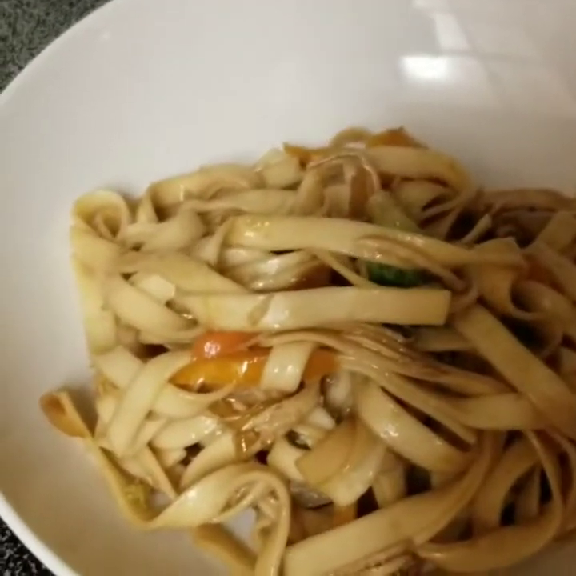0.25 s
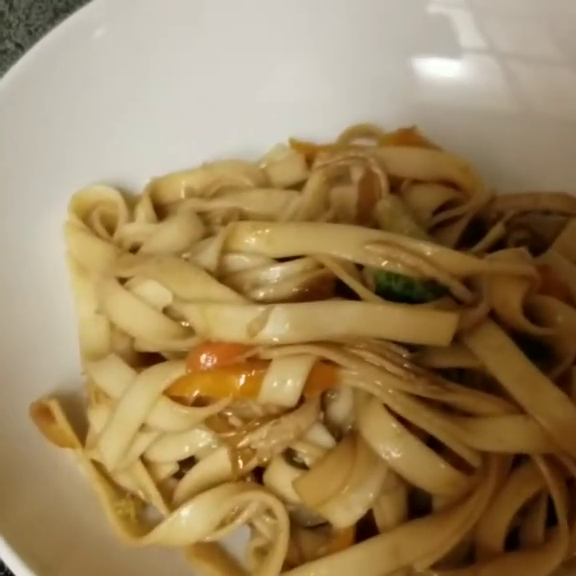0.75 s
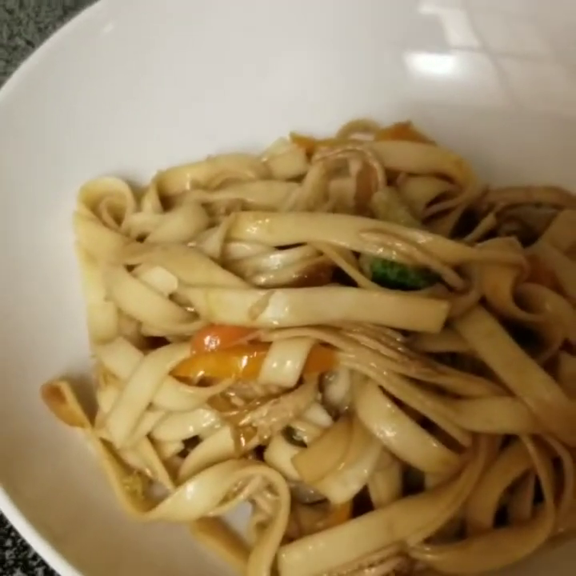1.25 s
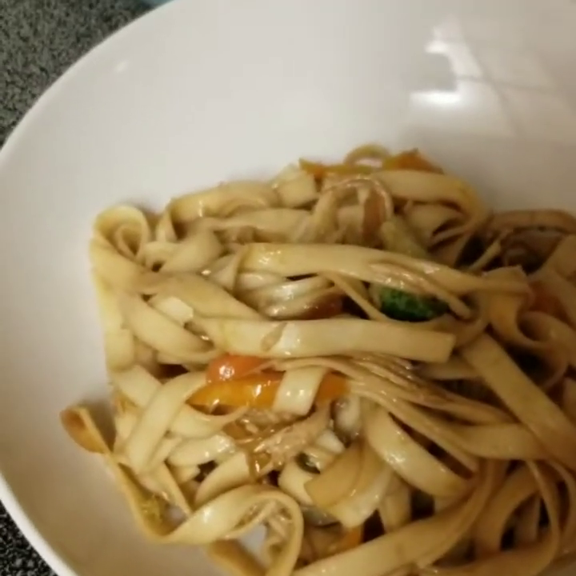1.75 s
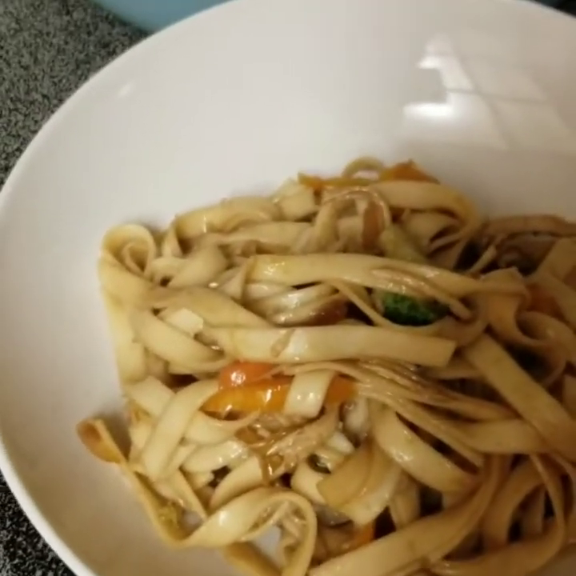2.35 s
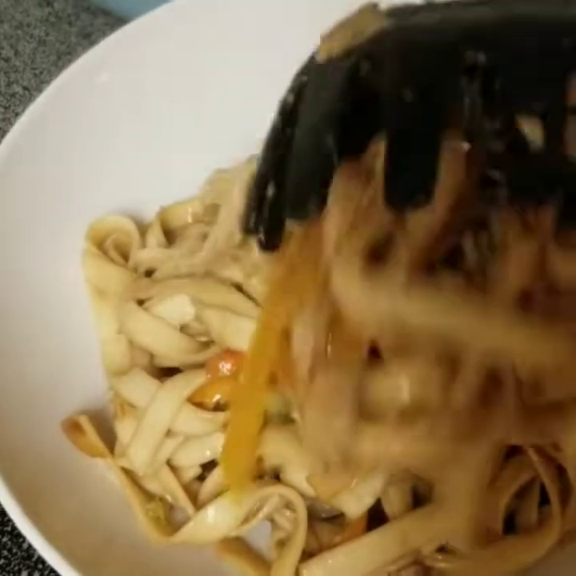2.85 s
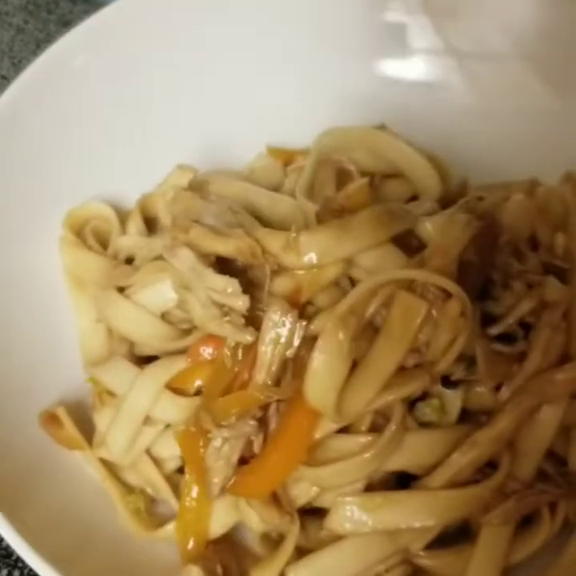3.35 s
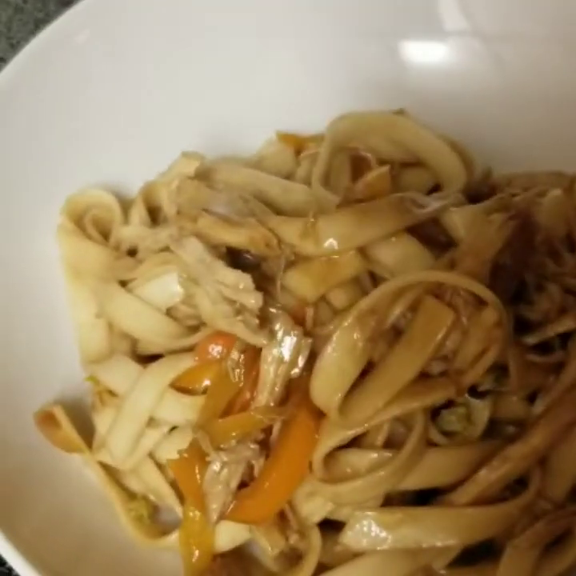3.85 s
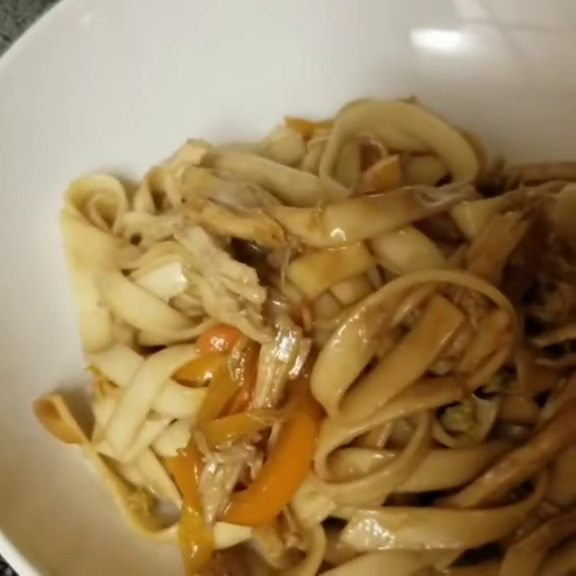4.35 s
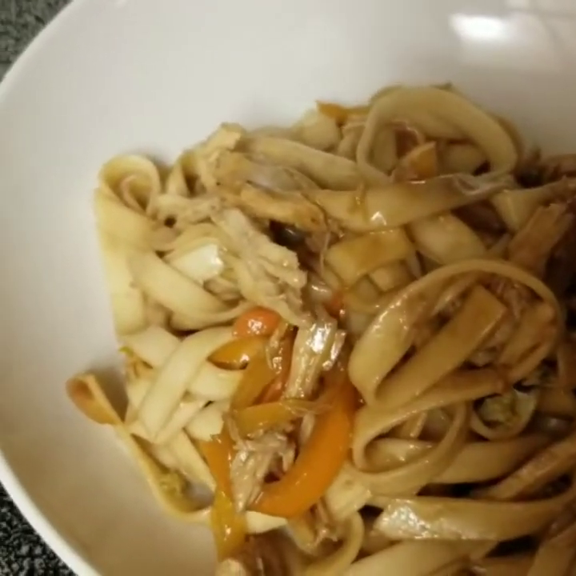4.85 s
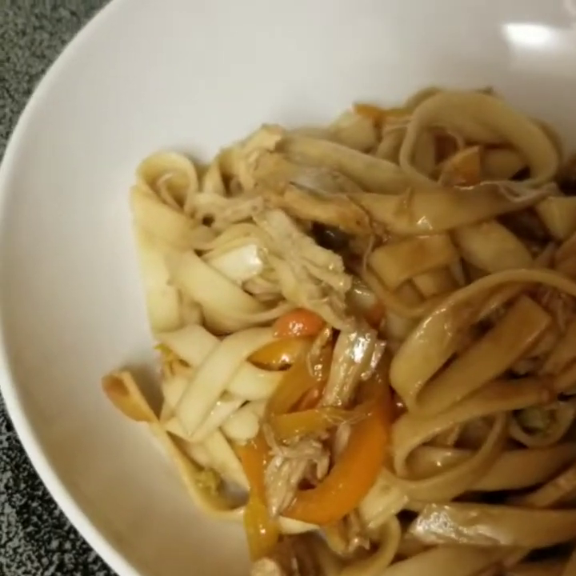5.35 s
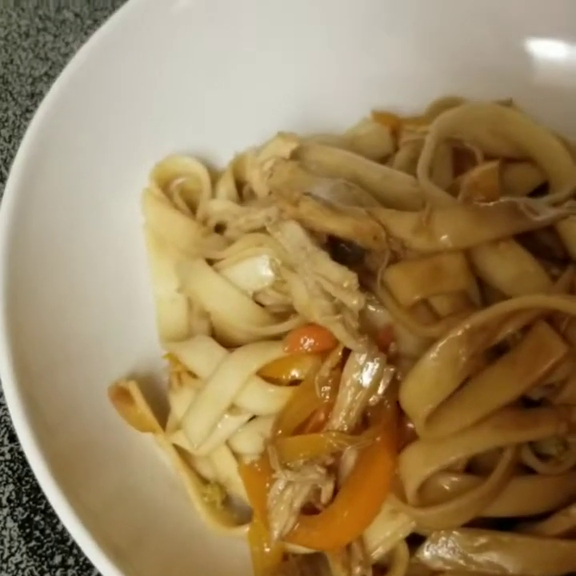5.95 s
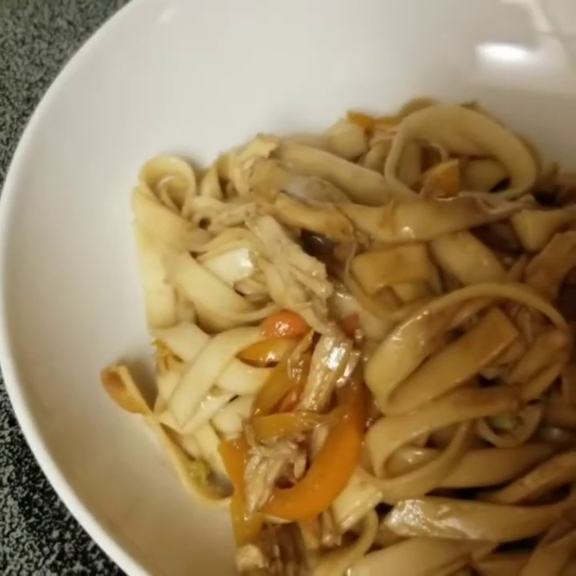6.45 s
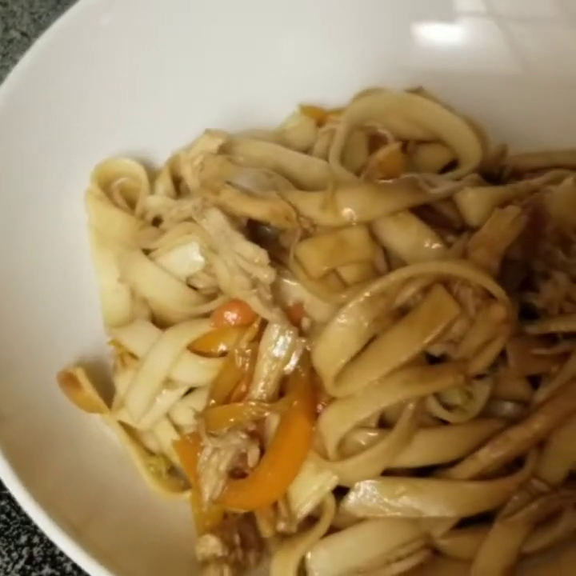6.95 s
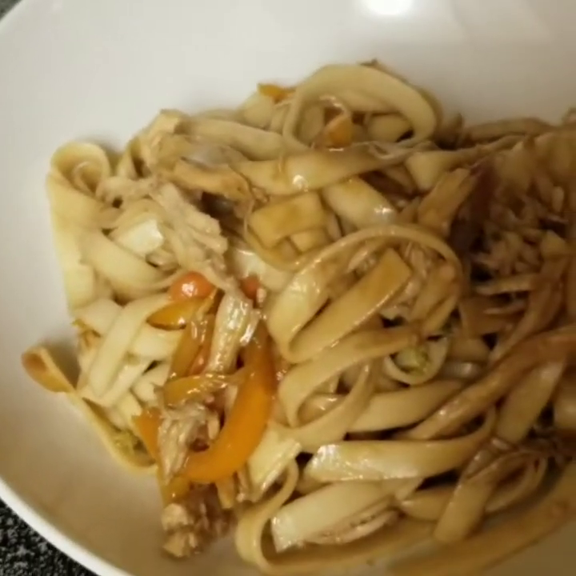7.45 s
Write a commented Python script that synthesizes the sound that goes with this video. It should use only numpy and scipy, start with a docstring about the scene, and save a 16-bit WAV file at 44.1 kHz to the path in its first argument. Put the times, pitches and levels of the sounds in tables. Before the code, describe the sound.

A soft low hum with moving air and faint hiss runs throughout. Close to the stereo microphone, tongs strike loaded crockery four times, each a hard, damped double click with little ring, some followed by a tiny skidding rattle. Brief rubbing squeaks come before three of them. Noodles smack and crackle very faintly between, with light handling rustles and a last tiny tap at the end.

```python
"""Tongs and noodles in a kitchen

Plastic tongs serve cooked noodles into a ceramic bowl, close to a stereo microphone.
Four times the tongs clack on the loaded crockery, one arm just after the other, exciting damped modes;
slips of the tips then skid on. Before three of the clacks, short scrapes squeak in sliding bands of noise.
The wet noodles smack and crackle faintly in bursts of noise, among light taps and handling rustles.
To the left an appliance hums on fixed lines and rumbles in shaped noise, under moving air and thin hiss."""
import sys
import numpy as np
from scipy import signal
from scipy.fft import rfft, irfft, next_fast_len
from scipy.io import wavfile
from scipy.ndimage import map_coordinates

SR = 44100
rng = np.random.default_rng(int(sys.argv[2]) if len(sys.argv) > 2 else 0)


def transcribe(signal):
    """Save signal, clipped to [-1, 1], as a 16-bit WAV file at the path in sys.argv[1]."""
    frames = np.atleast_2d(signal).T
    limited = np.clip(frames, -1, 1)
    pcm = np.round(limited * 32767).astype(np.int16)
    wavfile.write(sys.argv[1], SR, pcm)


N = 340011
TOP_HZ = 15780  # band limit of the recorder
# how alike the two sides of the kitchen noise and the rustles are: hz, likeness (1 = same on both sides)
LIKENESS = [(60, 1), (150, 0.94), (380, 1), (950, 0.11), (2380, 0.16), (5980, 0.055), (15000, 0.17)]


def amp(db):
    """Decibels to gain."""
    return 10 ** (np.asarray(db) / 20)


def unit(x):
    """Scale to rms 1."""
    return x / np.sqrt(np.mean(x ** 2) + 1e-20)


def along(points, hz):
    """Read (Hz, value) points on a log frequency axis."""
    f, v = np.transpose(points)
    return np.interp(np.log(hz + 1), np.log(f), v)


def level_curve(points):
    """Draw straight lines through (s, dB) points, one value per sample."""
    s, db = np.transpose(points)
    return np.interp(np.arange(N) / SR, s, db)


def wobble(rate):
    """A smooth random curve, rate knots a second."""
    knots = rng.standard_normal(int(N * rate / SR) + 4)
    return map_coordinates(knots, [np.arange(N) * rate / SR])


def filtered(x, response):
    """Multiply the spectrum of x by a response of frequency."""
    n = x.shape[-1]
    m = next_fast_len(n + 8192)
    return irfft(rfft(x, m) * response(np.fft.rfftfreq(m, 1 / SR)), m)[..., :n]


def band(x, low_hz, high_hz):
    """Causal band-pass."""
    edges = [low_hz, min(high_hz, SR / 2 - 100)]
    return signal.sosfilt(signal.butter(3, edges, btype="band", fs=SR, output="sos"), x)


def resonance(f, hz, width_hz):
    """Causal response of one resonance, 1 at its peak."""
    return 1j * f * width_hz / (hz * hz - f * f + 1j * f * width_hz)


def noise(spectrum, alike, n):
    """Coloured stereo noise of rms 1; a shared and an opposed part set the left-right likeness."""
    def response(hz):
        turn = np.arccos(np.clip(along(alike, hz), -1, 1)) / 2
        return amp(along(spectrum, hz)) * [np.cos(turn), np.sin(turn)]

    mid, side = filtered(rng.standard_normal((2, n)), response)
    return unit(np.array([mid + side, mid - side]))


def pan(db):
    """Channel gains for a left-right level difference."""
    return amp([[db / 2], [-db / 2]])


def add(track, s, sound):
    """Mix a sound into the track at time s."""
    part = track[:, round(s * SR):][:, :sound.shape[1]]
    part += sound[:, :part.shape[1]]


def kitchen(drift_db=0.68, drifts_per_s=3):
    """An appliance hums and rumbles, with moving air and a thin hiss; each layer drifts a little."""
    # spectra before scaling to rms 1: hz, relative_db
    rumble_colour = [(20, -9.5), (35, -11), (48, -7.5), (60, 6), (80, 0.5), (95, -3), (118, -12),
                     (135, -5.5), (170, -18.5), (260, -47)]
    air_colour = [(100, -11), (160, -4.5), (200, -0.5), (260, 1.5), (330, -4.5), (450, -8.5), (520, -6.5),
                  (680, -15.5), (820, -13.5), (1250, -23), (1600, -29), (2500, -55)]
    hiss_colour = [(900, -58), (1500, 14), (1750, 9.5), (2100, 13), (3000, 8.5), (3600, 9), (4200, 12),
                   (6300, 5), (8200, 5.5), (10000, -13), (12700, 8.5), (15800, -3.5)]
    # slow course of the level before its drift: time_s, level_db
    rumble_level = [(0, -41), (.35, -39), (.8, -43.5), (1.35, -45.5), (2.2, -38), (3.2, -40), (5.2, -41.5),
                    (5.95, -38), (6.8, -42), (7.3, -40)]
    hiss_level = [(0, -59.5), (5.9, -60), (7.3, -61)]
    # motor lines: pitch_hz, level_db before drift
    motor_lines = [(59.2, -67), (118.4, -47.5), (236.9, -65.5)]
    air_db = -46
    layers = [(level_curve(rumble_level), rumble_colour),
              (air_db, air_colour),
              (level_curve(hiss_level), hiss_colour)]
    out = np.zeros((2, N))
    for db, colour in layers:
        out += amp(db + drift_db * wobble(drifts_per_s)) * noise(colour, LIKENESS, N)
    t = np.arange(N) / SR
    for hz, db in motor_lines:
        line = np.sin(2 * np.pi * hz * t + 0.5 * wobble(5))
        out += amp(db + 2.1 * wobble(1.98)) * np.sqrt(2) * line
    return out


def from_left(x, lag_s=0.000331):
    """A source to the left reaches the right side later, and weaker in the middle range."""
    # hz, left_right_db
    side_balance = [(100, 0.5), (300, 0.4), (1500, 3), (4400, 2.5), (15000, -5)]
    sides = np.array([[1], [-1]])

    def response(hz):
        gain = amp(sides * along(side_balance, hz) / 2)
        return gain * np.exp(1j * np.pi * hz * lag_s * sides)

    return filtered(x, response)


def high_notes(width_hz=750):
    """Faint narrow bands of noise swell and fade in the hiss."""
    # start_s, length_s, level_db, centre_hz
    note_times = [(1.698, 1.2, -68.5, 7800), (4.298, 0.83, -63, 3480), (6.273, 0.45, -65, 4000)]
    out = np.zeros((2, N))
    for s, length, db, hz in note_times:
        n = int(length * SR)
        note = unit(filtered(rng.standard_normal((2, n)), lambda f: resonance(f, hz, width_hz)))
        add(out, s, amp(db) * signal.windows.tukey(n, .4) * note)
    return out


def walls(x):
    """The room's faint answer: a decaying noise tail that lasts longest in the middle range."""
    # hz, t60_s
    room_decay = [(200, 0.12), (1500, 0.24), (5000, 0.21), (14000, 0.13)]
    hz, t, z = signal.stft(rng.standard_normal((2, SR // 2)), SR, nperseg=256)
    decay = amp(-60 * t / along(room_decay, hz)[:, None])
    tail = signal.istft(z * decay, SR, nperseg=256)[1]
    return signal.fftconvolve(x, tail / np.linalg.norm(tail[0]), axes=1)[:, :N]


def slips(n, length_s, rate, uneven=0.45, scatter_db=4):
    """Stick and slip: n samples with pushes of uneven size at uneven intervals, until length_s."""
    count = 300
    gaps = np.exp(uneven * rng.standard_normal(count)) / rate
    times = np.cumsum(gaps) - gaps[0]
    sizes = amp(scatter_db * rng.standard_normal(count)) * rng.choice([-1, 1], count)
    sizes = sizes * (times < length_s)
    return np.bincount((times * SR).astype(int), sizes, n)[:n]


def grains(n, rate, life_s, smear):
    """Envelope near rms 1: each slip is a burst that dies away, over a smooth share."""
    bursts = signal.lfilter([1], [1, -np.exp(-1 / (life_s * SR))], slips(n, n / SR, rate) ** 2)
    return np.sqrt(bursts / bursts.mean() + abs(smear)) / np.sqrt(1 + abs(smear))


def rustles(grains_per_s=130, grain_s=0.0036, smear=0.4):
    """Faint handling: loose, soft grains of noise in the middle range."""
    # start_s, length_s, level_db before the stroke's fade in and out
    rustle_times = [(0.729, 0.2, -61), (2.865, 0.069, -77), (4.79, 0.06, -51.5), (5.332, 0.098, -53),
                    (5.494, 0.076, -57), (5.685, 0.09, -57), (5.985, 0.075, -59.5), (6.329, 0.32, -65)]
    # hz, relative_db
    colour = [(500, 5), (1200, 0), (2400, -0.5), (4200, -2.5), (6000, -12), (15000, -15)]
    out = np.zeros((2, N))
    for s, length, db in rustle_times:
        n = int(length * SR)
        stroke = signal.windows.tukey(n, .5) * grains(n, grains_per_s, grain_s, smear)
        add(out, s, amp(db) * stroke * noise(colour, LIKENESS, n))
    return out


def taps(t60=0.068, sharpness=4):
    """Tiny dull taps, each a short decaying burst of noise in one resonance."""
    # start_s, onset_level_db, resonance_hz
    tap_times = [(2.908, -58, 1450), (7.628, -49.5, 1930), (7.641, -50.5, 1590), (7.642, -63.5, 2700)]
    out = np.zeros((2, N))
    t = np.arange(SR // 20) / SR
    for s, db, hz in tap_times:
        burst = rng.standard_normal(len(t))
        tap = unit(filtered(burst, lambda f: resonance(f, hz, hz / sharpness)))
        add(out, s, amp(db - 60 * t / t60) * tap[None])
    return out


def settling():
    """Strength of the crackle: it swells at each shift of the heap and slowly dies down."""
    # the heap shifts: time_s, crackle_peak_db (relative)
    shift_times = [(0, -58), (0.5, -55.5), (1.56, -58.5), (2.68, -60), (3.95, -57.5), (5.5, -57.5),
                   (5.96, -61)]
    swell_db_per_s, settle_db_per_s, rest_db = 112, 14, -66
    t = np.arange(N) / SR
    spells = []
    for s, db in shift_times:
        drop_db = np.maximum(swell_db_per_s * (s - t), settle_db_per_s * (t - s))
        spells.append(db - drop_db)
    return amp(np.maximum(np.max(spells, axis=0), rest_db))


def noodles(smack_db=-10, smack_t60=0.018, crackle_db=-4, pops_per_s=600):
    """Films of sauce snap as sticky strands part: a few clear smacks over a fine crackle."""
    # start_s, relative_db (smack_db is added), resonance_hz
    smack_times = [(0.8919, -40, 8800), (1.726, -36, 14200), (2.6733, -37, 13500), (2.7475, -30.5, 5200),
                   (2.7555, -40, 8600), (2.816, -37, 4700), (3.9593, -36.5, 8400), (4.368, -36, 3230),
                   (4.488, -38, 13000), (5.7654, -35, 7670), (5.778, -27, 13100), (6.1802, -42, 4080),
                   (6.7885, -35, 13600), (6.802, -32.5, 10000), (7.187, -42, 13000)]
    out = np.zeros((2, N))
    t = np.arange(SR // 20) / SR
    for s, db, hz in smack_times:
        burst = rng.standard_normal((2, len(t)))
        pop = unit(filtered(burst, lambda f: resonance(f, hz, hz / 3) ** 2))
        add(out, s, amp(db + smack_db - 60 * t / smack_t60) * pop)
    pops = (rng.random(N) < pops_per_s / SR) * rng.exponential(size=N)
    # every pop is a new burst of a few milliseconds
    bursts = np.sqrt(np.abs(signal.fftconvolve(pops ** 2, np.exp(-t / 0.0032))[:N]))
    crackle = unit(band(bursts * rng.standard_normal((2, N)), 7200, TOP_HZ))
    return pan(-6.5) * (out + amp(crackle_db) * settling() * crackle)


def squeak(n, hz, width_hz, glide):
    """A narrow stereo band of noise whose pitch slides by the share glide over n samples."""
    flutter = filtered(rng.standard_normal((2, 2, n)), lambda f: 1 / (1 + (f / width_hz) ** 2))
    phase = 2 * np.pi * np.cumsum(hz * (1 + glide * np.linspace(-.5, .5, n))) / SR
    mid, side = flutter[0] * np.cos(phase) + flutter[1] * np.sin(phase)
    return unit(np.array([mid + 0.47 * side, mid - 0.93 * side]))


def scrapes(squeak_db=0.5, width_hz=115, second_glide=0.023, grains_per_s=220, grain_s=0.0043, smear=0.46):
    """Wet rubbing: the tips catch and slip, and grains excite a sliding squeak and a second resonance."""
    # start_s, length_s, grit_db, squeak_hz, glide_share, second_hz, second_db (re the grit)
    scrape_times = [(0.269, 0.029, -42, 1083, 0.06, 1450, -8),
                    (0.286, 0.043, -37.5, 1434, -0.026, 1060, -8),
                    (0.316, 0.065, -42.5, 1020, -0.08, 2720, -16),
                    (3.755, 0.035, -51, 1910, 0.042, 4000, -6), (5.243, 0.029, -46, 1048, 0.07, 2600, -19),
                    (5.258, 0.035, -46, 966, 0.05, 2650, -9), (5.279, 0.061, -46, 1017, -0.069, 2620, -5)]
    # hz, relative_db
    colour = [(300, -17), (550, -5), (750, -1.5), (1000, -2), (1350, -4), (1700, -11), (2400, -5.5),
              (3400, -12), (5000, -17.5), (8000, -23.5), (15000, -28)]
    out = np.zeros((2, N))
    for s, length, db, hz, glide, second_hz, second_db in scrape_times:
        n = int(length * SR)
        grit = noise(colour, [(800, 0.13), (4000, 0.091)], n)
        tones = amp(squeak_db) * squeak(n, hz, width_hz, glide)
        tones += amp(second_db) * squeak(n, second_hz, width_hz, second_glide)
        stroke = signal.windows.tukey(n, .5) * grains(n, grains_per_s, grain_s, smear)
        add(out, s, amp(db) * stroke * (grit + tones))
    return pan(0.75) * out


def register_levels(db, thud_db, tilt_db):
    """Levels of the four registers: weight adds thud, a softer contact loses more with each step up."""
    return db + thud_db, db, db + tilt_db, db + 2 * tilt_db


def retuned(share):
    """All modes shift together by one share, lower where the tongs press on more food."""
    # tongs and crockery ringing together, damped by food: base_hz, relative_db, base_t60_s
    body_modes = [(162, -2, 0.053), (224, -4, 0.046), (284, -4.5, 0.07), (380, 5.5, 0.055),
                  (452, -0.5, 0.097), (525, -4, 0.045), (614, -4.5, 0.076), (788, -8, 0.084),
                  (881, 0, 0.044), (980, -2, 0.036), (1257, 5.5, 0.054), (1354, 1, 0.038),
                  (1425, -3, 0.044), (1586, -1.5, 0.082), (1670, -3, 0.042), (2198, -1, 0.045),
                  (2700, -14, 0.047), (4010, 1, 0.068), (4240, 0, 0.06), (4650, -3, 0.04),
                  (5210, 0.5, 0.035), (5480, -3, 0.028), (6850, -3, 0.032), (7620, -7, 0.027)]
    return [(hz * share, db, t60) for hz, db, t60 in body_modes]


def favoured(x, spots_hz, boost_db, sharpness=11):
    """The spot struck brings out a few narrow ranges."""
    peaks = sum(signal.lfilter(*signal.iirpeak(hz, sharpness, SR), x) for hz in spots_hz)
    return x + amp(boost_db) * peaks


def ring(pitch, spots_hz, spot_db, dense_db, damping=1, crack_db=3, crack_t60=0.014,
         scatter_db=2.5, spread=0.55, rise_s=0.0012):
    """One contact in each register: a crack, then modes at new strengths over a dense, short ring."""
    # registers of a contact: low_hz, high_hz, dense_t60_s at damping 1, left_right_db
    register_bands = [(118, 896, 0.025, -1.5), (680, 2760, 0.064, 1), (2250, 7100, 0.088, 0),
                      (6930, 14400, 0.053, -6.5)]
    # dense ring between the modes: hz, relative_db
    dense_colour = [(100, 5.5), (450, 2.5), (600, 8.5), (750, 0), (1000, 6.5), (1600, -6.5), (1900, -1),
                    (2600, -4), (3200, -6.5), (4100, 5.5), (5000, -8), (8000, -6.5), (11000, -14.5),
                    (16000, -11)]
    t = np.arange(SR // 10) / SR
    hz, db, t60 = np.transpose(retuned(pitch))[:, :, None, None]
    size = amp(db + scatter_db * rng.standard_normal(hz.shape))
    # each mode lags the one below it; the higher the mode, the more its phase differs between the sides
    phase = -np.pi / 2 * np.arange(len(hz))[:, None, None]
    phase = phase + spread * np.sqrt(hz / 1000) * rng.standard_normal((len(hz), 2, 1))
    decay = amp(-60 * t * damping / t60)
    tones = np.sum(size * decay * np.sin(2 * np.pi * hz * t + phase), axis=0)
    tones = tones * (1 - np.exp(-t / rise_s))
    dense = amp(dense_db) * noise(dense_colour, [(500, 1.0), (1200, 0.15), (4000, 0.035)], len(t))
    crack = amp(crack_db - 60 * t / crack_t60)
    parts = []
    for low_hz, high_hz, life, side_db in register_bands:
        dense_ring = dense * (crack + amp(-60 * t * damping / life))
        parts.append(pan(side_db) * band(tones + dense_ring, low_hz, high_hz))
    return favoured(np.array(parts), spots_hz, spot_db)


def skids(slips_per_s=520, fade_db=5, release_db_per_s=500, dense_db=11, spot_db=4):
    """After a blow a run of small slips rattles the same modes, which the pressed tips damp."""
    # start_s, length_s, level_db, thud_db, tilt_db per register, pitch_share, two favoured spots_hz
    skid_times = [(0.456, 0.049, -29.5, 3.5, -8, 1, 444, 875),
                  (3.785, 0.027, -36.5, -5, -5, 0.79, 2180, 2300),
                  (3.808, 0.025, -42.5, 1, -3, 0.95, 1290, 2200),
                  (4.748, 0.033, -46, -3, -12, 0.97, 760, 1530),
                  (5.419, 0.0096, -34, 5.5, -13, 1, 446, 4050)]
    out = np.zeros((2, N))
    for s, length, db, thud_db, tilt_db, pitch, *spots_hz in skid_times:
        n = int(length * SR)
        t = np.arange(n + SR // 20) / SR
        press = amp(-fade_db * t / length - release_db_per_s * np.maximum(t - length, 0))
        tips = 0
        # each of the two tips slips in its own time
        for _ in range(2):
            contact = ring(pitch, spots_hz, spot_db, dense_db, damping=1.1)
            pushes = slips(len(t), length, slips_per_s / 2)
            tips = tips + signal.fftconvolve(contact, pushes[None, None], axes=2)
        registers = press * tips[..., :len(t)]
        for level, chatter in zip(register_levels(db, thud_db, tilt_db), registers):
            add(out, s, amp(level) * chatter / chatter[:, :n].std())
    return out


def knocks(dense_db=5, crack_db=1):
    """Both arms of the tongs strike in turn and set the registers ringing."""
    # start_s, level_db, thud_db, tilt_db per register, pitch_share, three favoured spots_hz,
    # spot_boost_db, second_arm_delay_s, second_arm_db (re the first), left_right_db
    blows = [(0.4444, -17.5, 0.5, -4, 1.02, 1320, 1630, 5300, -8, 0.0056, -6.5, 0),
             (0.467, -25, -11, -8.5, 1.01, 600, 970, 1340, 5, 0.0115, -2.5, 0),
             (3.7772, -26.5, -0.5, -9.5, 0.99, 360, 557, 2680, 2.5, 0.006, -8, -1),
             (3.8011, -38.5, -6, -1, 0.95, 1470, 4450, 6450, 4, 0.003, -1, 0.5),
             (3.8202, -42.5, -5.5, -1.5, 0.89, 590, 1380, 2700, 18, 0.0033, 2, 0),
             (4.7181, -24, -6.5, -6.5, 0.97, 476, 810, 1070, 0.5, 0.0065, -5, 0.22),
             (5.183, -45.5, 4, -6, 1.01, 276, 1280, 7060, 4, 0.007, -2, 0),
             (5.4114, -25.5, -0.2, -9, 0.98, 182, 261, 1380, 1.5, 0.0055, -3.5, 0.2),
             (5.458, -56, -2, -1, 0.97, 380, 1300, 4100, -4, 0.005, 7, 0)]
    second_thud_db, second_tilt_db = 5.5, -3  # the other arm lands with more weight, and duller
    out = np.zeros((2, N))
    for s, db, thud_db, tilt_db, pitch, *spots_hz, spot_db, arm_s, arm_db, side_db in blows:
        first = register_levels(db, thud_db, tilt_db)
        second = register_levels(db + arm_db, thud_db + second_thud_db, tilt_db + second_tilt_db)
        for late_s, levels in [(0, first), (arm_s, second)]:
            contact = ring(pitch, spots_hz, spot_db, dense_db, crack_db=crack_db)
            for level, part in zip(levels, contact):
                # a level is the ring's energy spread over a hundredth of a second
                strength = np.sqrt(np.sum(part ** 2) / (2 * SR / 100))
                add(out, s + late_s, pan(side_db) * amp(level) * part / strength)
    return out


def scene():
    """Tongs and noodles close by, the kitchen behind."""
    background = from_left(kitchen()) + high_notes()
    small_sounds = taps() + rustles() + noodles()
    tongs = scrapes() + skids() + knocks()
    return background + small_sounds + tongs + amp(-12.0) * walls(tongs)


def record(dry):
    """The recorder keeps nothing above its band limit."""
    return filtered(dry, lambda hz: hz < TOP_HZ)


dry = scene()
out = record(dry)
transcribe(out)
```